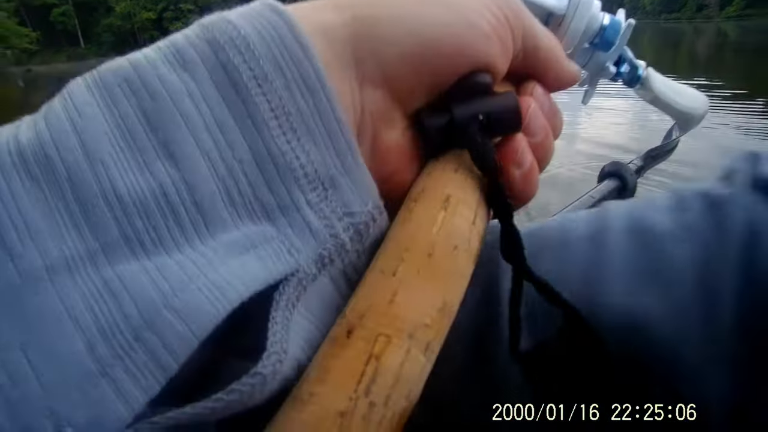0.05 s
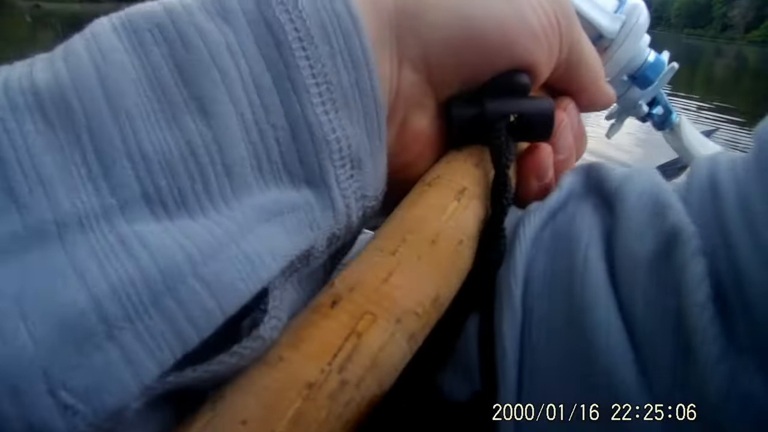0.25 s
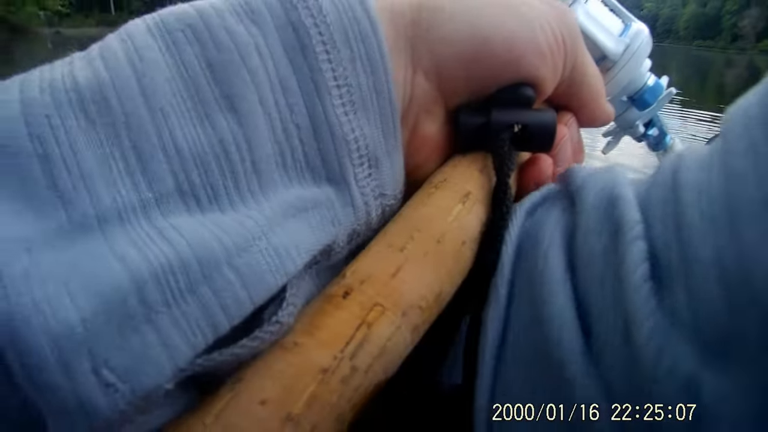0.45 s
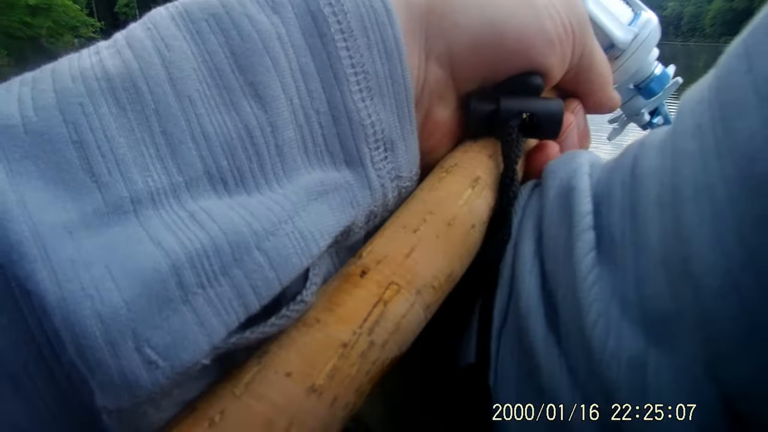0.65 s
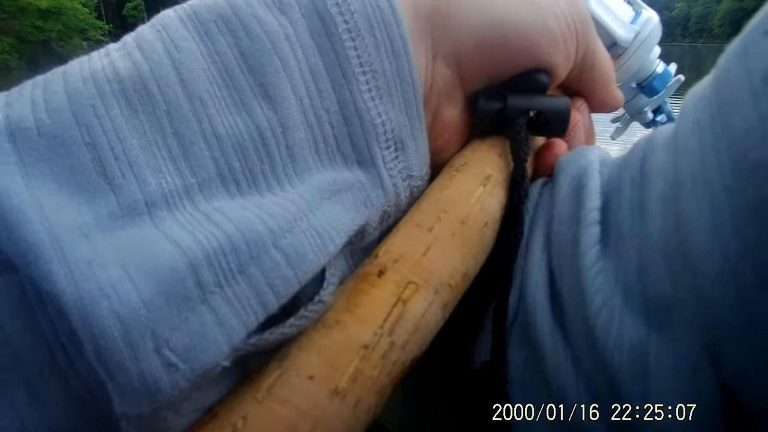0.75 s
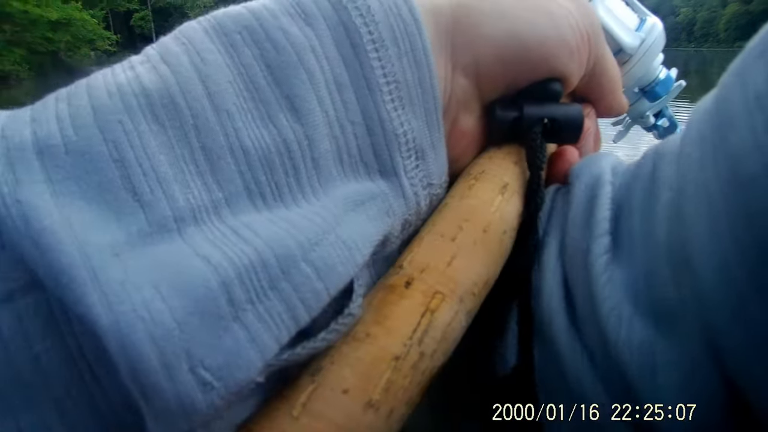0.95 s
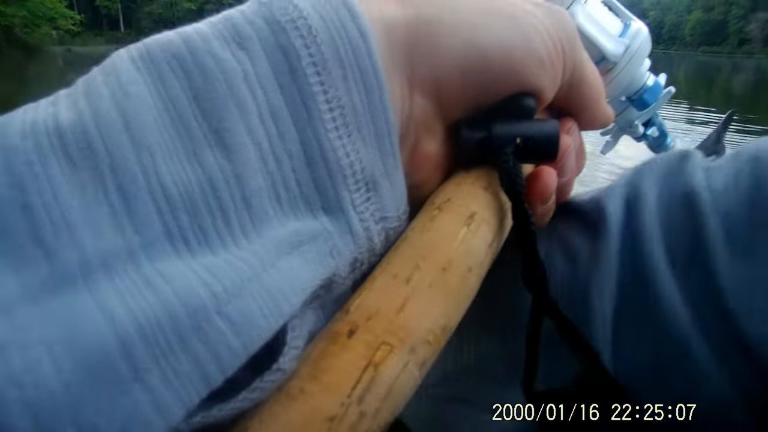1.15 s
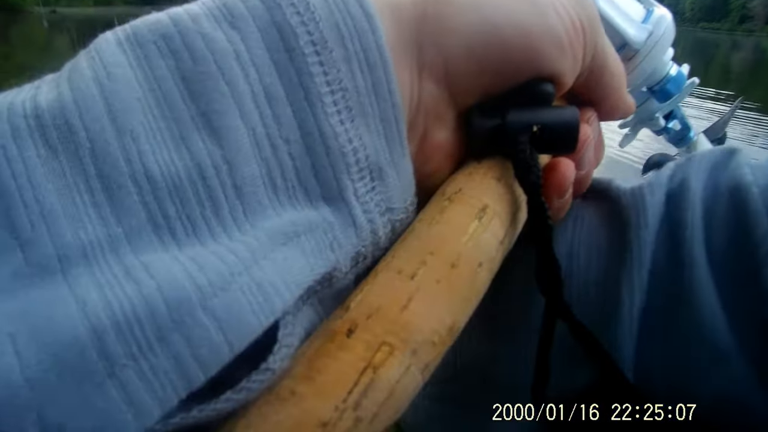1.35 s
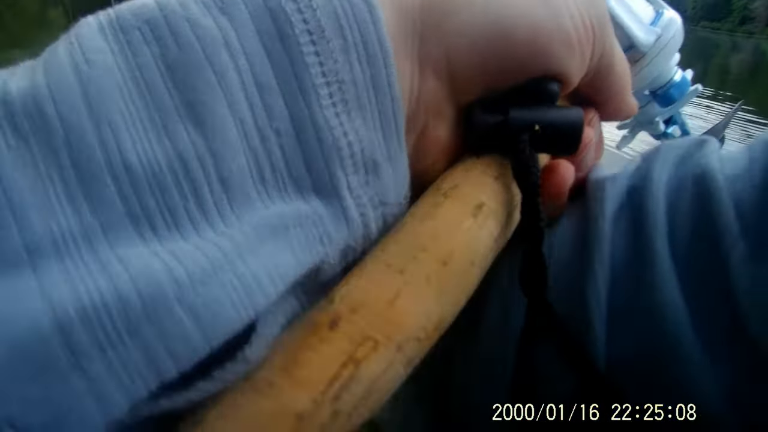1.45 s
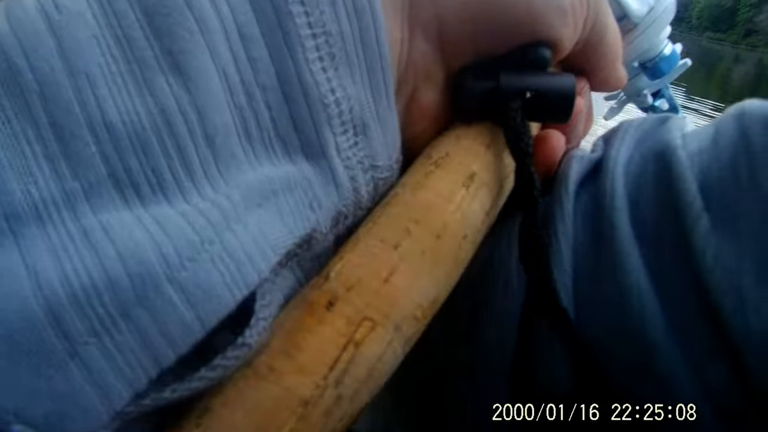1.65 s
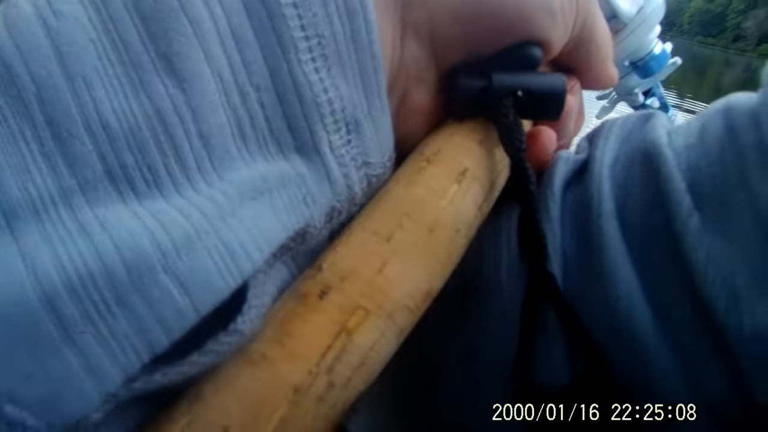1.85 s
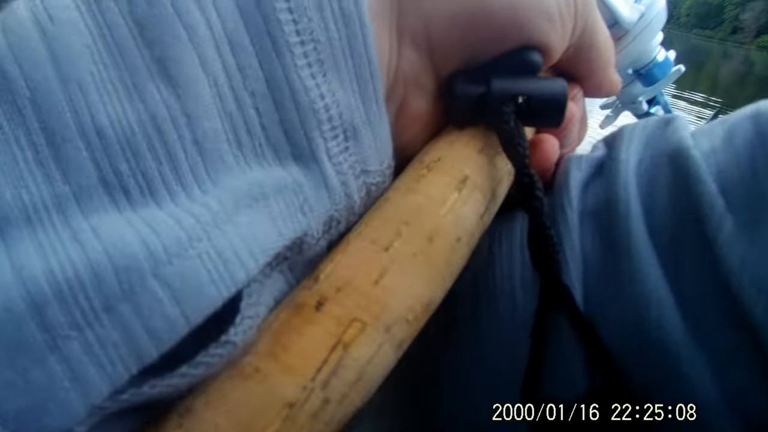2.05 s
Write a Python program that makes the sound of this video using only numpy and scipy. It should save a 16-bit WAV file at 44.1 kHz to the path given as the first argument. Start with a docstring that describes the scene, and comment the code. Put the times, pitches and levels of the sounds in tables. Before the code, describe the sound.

A hollow thump and brief rattle of fishing gear in a boat, with sleeve rustle.

```python
"""Faint outdoor air and microphone hiss, then a sleeve rubbing right on a body-worn camera's case.
We are in a small boat on a quiet lake, where a fishing rod is handled close to the microphone.
Gear bumps the hollow hull and sets it ringing; a few hard ticks rattle against the plastic case.
Lighter strokes of the sleeve follow, with a second, softer bump under the last of them."""
import sys
import numpy as np
from scipy import signal
from scipy.fft import rfft, irfft
from scipy.io import wavfile
from scipy.ndimage import uniform_filter1d

SR = 44100
rng = np.random.default_rng(int(sys.argv[2]) if len(sys.argv) > 2 else 0)


def inscribe(sig):
    """Save sig as 16-bit PCM at rate SR to the path in sys.argv[1].

    A 1-D sig is mono; a 2-D sig holds one channel per row.
    Samples are clipped to [-1, 1] before scaling.
    """
    pcm = np.round(np.clip(np.atleast_2d(sig).T, -1, 1) * 32767)
    wavfile.write(sys.argv[1], SR, pcm.astype(np.int16))


N = 92610

# Lake air and microphone hiss. Each row: frequency in Hz, relative spectral density in dB.
AIR_SPECTRUM = [(12, -36), (20, -0.5), (133, -3.5), (170, -3.5), (207, -4.5), (238, -4.5), (382, -8),
                (439, -9.5), (504, -13.5), (548, -11.5), (983, -14), (1100, -20), (1300, -17), (1580, -18),
                (5210, -29.5), (14200, -33), (15400, -36.5)]
# Case resonances stirred by the air. Each row: centre in Hz, half-width in Hz, level in dB.
AIR_RESONANCES = [(444, 67, -77.5), (560, 62, -73.5), (1260, 150, -72.5)]
# Cloth heard through the case. Each row: frequency in Hz, relative spectral density in dB.
CLOTH_SPECTRUM = [(30, -2), (150, -3.5), (290, 0), (410, -5.5), (560, -1), (670, -6), (850, -7.5),
                  (1030, -11.5), (1270, 3), (1470, -5), (1700, -5.5), (1880, -9.5), (2030, -5.5),
                  (2260, -16), (2500, -14), (2900, -21.5), (3350, -13), (3700, -12), (3950, -21),
                  (4200, -11.5), (4450, -21), (4700, -15.5), (5300, -24), (6500, -29), (8500, -31.5),
                  (15000, -37)]
# The course of the sleeve's first, firm rub. Each row: time in seconds, level in dB.
FIRM_RUB = [(0, -71), (.12, -64), (.165, -54), (.195, -47), (.235, -44.5), (.305, -45.5), (.33, -48),
            (.352, -50.5), (.375, -54), (.425, -52.5), (.455, -62)]
# Lighter strokes of the sleeve. Each row: start, rise, hold and release in seconds, level in dB,
# tilt in dB per octave.
LIGHT_STROKES = [(.46, 0.065, 0.021, 0.17, -56, 1), (1.02, 0.12, 0.032, 0.11, -57, 0),
                 (1.18, 0.044, 0.034, .03, -59.5, 0.9), (1.38, .085, 0.061, 0.064, -57.5, -.5)]
# Gear striking the hull. Each row: start in seconds, gains of hull ring, crack and air push in dB,
# tilt of the crack in dB per octave.
HULL_BUMPS = [(0.2012, -16, -16.5, -69, 0.5), (1.4370, -33, -43, -43, -5.5)]
# Modes of the contact's crack, the hollow hull and the camera's case.
# Each row: frequency in Hz, relative level in dB, seconds to fall by 60 dB.
CRACK_MODES = [(495, -1, 0.0097), (720, 3.5, .012), (1085, -3, 0.019), (1261, -12, 0.062),
               (1460, -15.5, 0.03), (1875, -11, 0.021), (2110, -11, 0.011), (2243, -15.5, 0.016),
               (2730, -18.5, 0.0049)]
HULL_MODES = [(141, -17, 0.085), (274.4, -9.5, 0.076), (307.4, -4, 0.034), (414, -17, 0.28), (553, 1, 0.07),
              (605, 3, 0.037), (780, -9, 0.048), (847, -9, 0.03)]
CASE_MODES = [(426, -6, 0.035), (872, -2, 0.029), (1156, -2.5, 0.018), (1290, -6, 0.022), (1520, 0, 0.013),
              (1684, -3.5, 0.022), (2050, -7.5, 0.019), (2536, -11, 0.015), (3240, -10, 0.014),
              (3567, -12, 0.02), (4170, -19, 0.015), (4570, -24, 0.018), (5530, -27.5, 0.013),
              (6410, -16.5, 0.0062)]
# Ticks against the case. Each row: start in seconds, gain in dB, tilt in dB per octave,
# contact softness in seconds, low cut in Hz.
CASE_TICKS = [(0.249, -38.5, 0.5, 0.00071, 700), (0.2718, -42, -0.5, 0.00044, 1000),
              (.2790, -29, 1, 0.00053, 1310), (0.3112, -27.5, -0.5, 0.00088, 1450),
              (0.3369, -24, -1, 0.00025, 645), (.3505, -45.5, -9, 0.00061, 710)]

TILT_PIVOT_HZ = 1380


def amp(db):
    """Decibels to gain."""
    return 10 ** (np.asarray(db) / 20)


def unit(x):
    """Scales to rms 1."""
    return x / np.sqrt(np.mean(x ** 2) + 1e-20)


def add(mix, start_s, sound):
    """Mixes a sound in at a time."""
    part = mix[max(round(start_s * SR), 0):][:len(sound)]
    part += sound[:len(part)]


def colour(x, spectrum, tilt_db=0):
    """Shapes a sound by a spectrum and a tilt per octave, at rms 1."""
    hz = np.fft.rfftfreq(N, 1 / SR) + 1
    points_hz, points_db = np.transpose(spectrum)
    db = np.interp(np.log(hz), np.log(points_hz), points_db) + tilt_db * np.log2(hz / TILT_PIVOT_HZ)
    return unit(irfft(rfft(x) * amp(db), N))


def wander(span_s):
    """Slow random motion of rms 1."""
    size = max(int(span_s * SR), 2)
    return unit(uniform_filter1d(uniform_filter1d(rng.standard_normal(N), size), size))


def band(hz, half_width_hz):
    """Noise in one resonance, at rms 1."""
    detuning = (np.fft.rfftfreq(N, 1 / SR) - hz) / half_width_hz
    return unit(irfft(rfft(rng.standard_normal(N)) / (1 + detuning ** 2), N))


def ring(modes, rise_s, tilt_db=0):
    """Dying sines of alternating sign that swell in over the time of contact."""
    t = np.arange(SR // 2) / SR
    tones = np.zeros(len(t))
    for k, (hz, db, t60) in enumerate(modes):
        gain = (-1) ** k * amp(db + tilt_db * np.log2(hz / TILT_PIVOT_HZ))
        tones += gain * amp(-60 * t / t60) * np.sin(2 * np.pi * hz * t)
    return tones * (1 - np.exp(-t / rise_s))


def air_and_hiss():
    """Open air on the lake stirs the case faintly; the camera adds hiss and a thin electronic whine."""
    noise = amp(-59.5) * colour(rng.standard_normal(N), AIR_SPECTRUM)
    low_air = signal.sosfiltfilt(signal.butter(2, 730, fs=SR, output="sos"), noise)
    slight_waver = low_air * (amp(-0.02 * wander(span_s=0.017)) - 1)
    resonances = sum(amp(db) * band(hz, width) for hz, width, db in AIR_RESONANCES)
    whine = amp(-93) * band(hz=14286, half_width_hz=4)
    return noise + slight_waver + resonances + whine


def cloth_friction(tilt_db=0, slips_per_s=4000, spread_db=2.5, smooth_share=0.6):
    """Many tiny slips of fibres over a smooth hiss, heard through the case."""
    slips = (rng.random(N) < slips_per_s / SR) * rng.choice([-1, 1], N)
    sizes = amp(spread_db * np.minimum(rng.exponential(1, N), 4))
    grain = np.sqrt(1 - smooth_share) * unit(slips * sizes)
    hiss = np.sqrt(smooth_share) * rng.standard_normal(N)
    return colour(grain + hiss, CLOTH_SPECTRUM, tilt_db)


def sleeve(rub_flutter_db=1.8, stroke_flutter_db=1.3, flutter_s=0.0042):
    """Cloth drags right at the microphone: one firm rub as the arm swings in, then lighter strokes."""
    t = np.arange(N) / SR
    rub_db = np.interp(t, *np.transpose(FIRM_RUB)) + rub_flutter_db * wander(flutter_s)
    first_start, first_rise = LIGHT_STROKES[0][:2]
    fade = np.interp(t, [FIRM_RUB[-1][0], first_start + first_rise], [1, 0])
    out = amp(rub_db) * fade * cloth_friction()
    for start, rise, hold, release, db, tilt_db in LIGHT_STROKES:
        pressure = np.interp(t, start + np.cumsum([0, rise, hold, release]), [0, 1, 1, 0])
        out += pressure * amp(db + stroke_flutter_db * wander(flutter_s)) * cloth_friction(tilt_db)
    return out


def hull_bumps(hull_lag_s=0.0018, push_lag_s=0.013, push_width_s=0.023, push_hz=22.4):
    """Close by, each bump cracks, rings the hollow hull and pushes a little air at the microphone."""
    out, t = np.zeros(N), np.arange(N) / SR
    for start, hull_db, crack_db, push_db, tilt_db in HULL_BUMPS:
        add(out, start, amp(crack_db) * ring(CRACK_MODES, rise_s=0.0002, tilt_db=tilt_db))
        add(out, start + hull_lag_s, amp(hull_db) * ring(HULL_MODES, rise_s=0.001))
        from_peak = t - start - push_lag_s
        swell = np.exp(-(from_peak / push_width_s) ** 2 / 2)
        out -= amp(push_db) * swell * np.cos(2 * np.pi * push_hz * from_peak)
    return out


def case_rattle():
    """Hard little contacts ring the plastic case around the microphone, its low modes held back."""
    out = np.zeros(N)
    for start, db, tilt_db, softness_s, low_cut_hz in CASE_TICKS:
        low_cut = signal.butter(2, low_cut_hz, "high", fs=SR, output="sos")
        add(out, start, amp(db) * signal.sosfilt(low_cut, ring(CASE_MODES, softness_s, tilt_db)))
    return out


def scene():
    """The boat in mono, from one microphone worn on the body."""
    return (air_and_hiss() + sleeve() + hull_bumps() + case_rattle())[None]


def record(dry):
    """The camera cuts the treble steeply at 15520 Hz."""
    low_pass = signal.firwin(511, 15520, window=("kaiser", 9), fs=SR)
    return signal.oaconvolve(dry, low_pass[None], "same")


dry = scene()
out = record(dry)
inscribe(out)
```